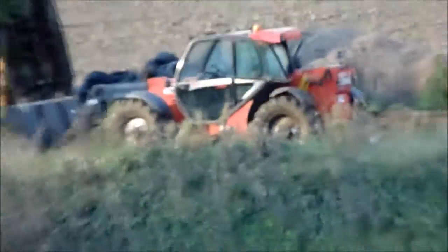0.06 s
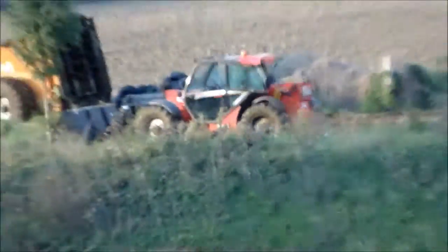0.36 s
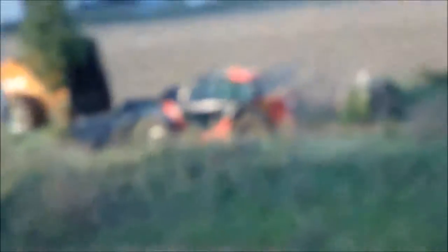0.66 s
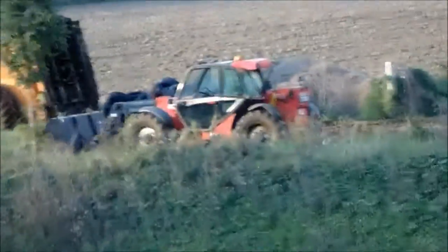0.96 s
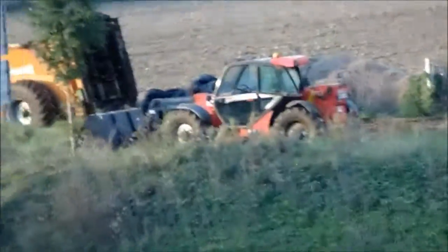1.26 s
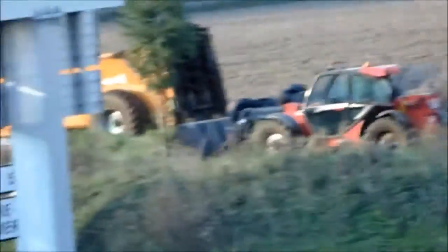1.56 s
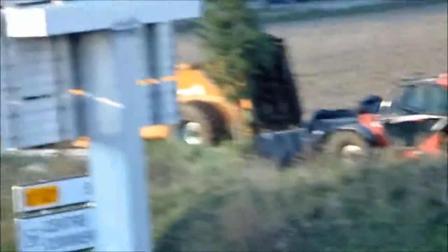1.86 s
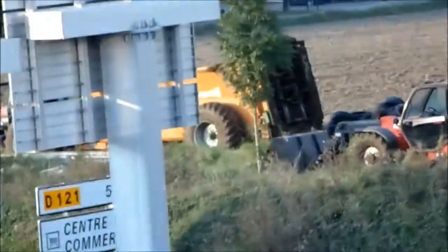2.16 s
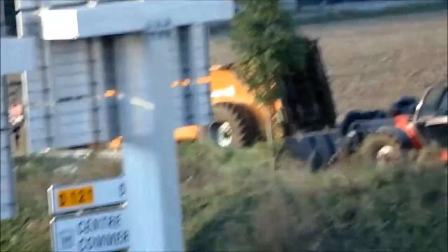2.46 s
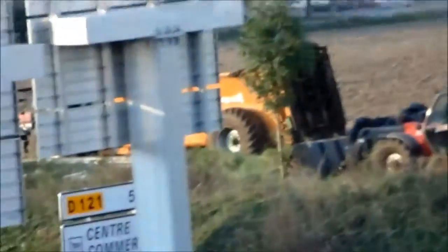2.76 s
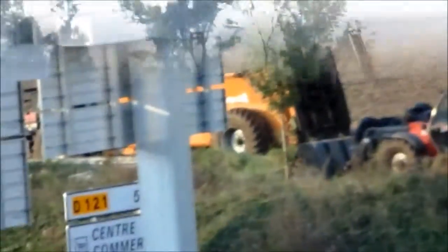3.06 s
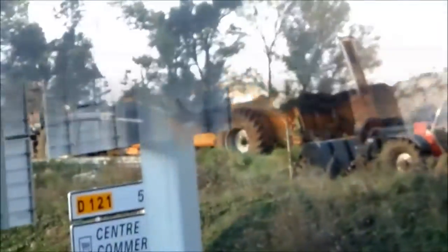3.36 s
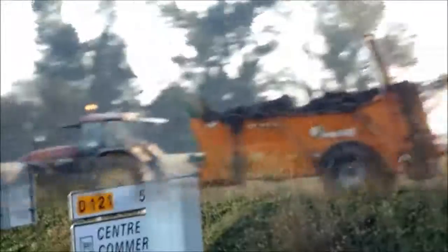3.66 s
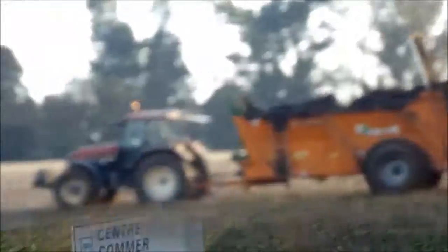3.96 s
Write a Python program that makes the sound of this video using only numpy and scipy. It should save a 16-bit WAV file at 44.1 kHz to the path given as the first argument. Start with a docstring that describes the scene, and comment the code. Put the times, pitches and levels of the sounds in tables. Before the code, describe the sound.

Tyres of passing traffic roar and hiss over a low farm engine. The roar suddenly becomes louder and steady, with a tractor pulling at higher revs. Outdoors, light wind nudges the microphone and the handheld camera clicks.

```python
"""Tyres roar and hiss past farm vehicles working in a field; their ground echo sweeps as the traffic moves,
and the tread hums briefly. Under them a low exhaust note sinks slowly. At 2.8 s the scene cuts to a
louder, steady roar and a tractor pulling at higher revs. Throughout, the camera body clicks in the hand
and wind nudges the microphone."""
import sys
import numpy as np
from scipy import signal
from scipy.io import wavfile
from scipy.ndimage import map_coordinates

SR = 44100
rng = np.random.default_rng(int(sys.argv[2]) if len(sys.argv) > 2 else 0)


def waveform_to_disk(signal):
    """Save audio, clipped to [-1, 1], as 16-bit WAV at the path in sys.argv[1]."""
    frames = np.transpose(np.atleast_2d(signal))
    scaled = np.clip(frames, -1, 1) * 32767
    samples = np.round(scaled).astype(np.int16)
    wavfile.write(sys.argv[1], SR, samples)


N = 176400


def passing_tyres(centre_hz=1128, ground_share=.28):
    """Tread roar of shifting pitch, plus hiss, combed by a ground echo whose lag shrinks."""
    # Each row: time in seconds, roar level in dB, roar pitch in Hz.
    roar_curve = [(0, -31.5, 1100), (.4, -31.5, 1037), (.68, -30, 1005), (1.0, -31, 1050),
                  (1.3, -29.5, 1090), (1.7, -30.5, 1196), (1.92, -31.5, 1170), (2.1, -31.5, 1150),
                  (2.4, -32, 1130), (2.65, -33, 1190), (2.76, -31.5, 1110)]
    # Each row: time in seconds, hiss level in dB.
    hiss_curve = [(0, -48), (.45, -47.5), (.72, -45), (1.05, -45.5), (1.5, -47.5), (1.85, -46.5),
                  (2.0, -51), (2.13, -45), (2.35, -52), (2.6, -51), (2.75, -48)]
    # Each row: time in seconds, echo lag in ms.
    ground_lag = [(0, 1.175), (.2, 1.14), (.4, 1.09), (.6, 1.02), (.9, .9), (1.2, .79), (1.5, .68),
                  (1.75, .59), (2.1, .55), (2.75, .52)]
    # Each row of both spectra: frequency in Hz, relative density in dB.
    roar_spectrum = [(250, -36), (400, -21.5), (600, -12.5), (820, -3), (1100, 0), (1500, -3), (2100, -12),
                     (3000, -16.5), (4500, -28), (7000, -50.5), (14000, -50)]
    hiss_spectrum = [(2500, -4), (5000, 2.5), (6000, -4), (8000, 2.5), (10500, -8.5), (14000, -2.5)]
    roar_db, pitch_hz = in_time(roar_curve)
    hiss_db, = in_time(hiss_curve)
    lag_ms, = in_time(ground_lag)
    roar = banded_noise(roar_spectrum, flicker_db=.75, flicker_hz=18, shift=pitch_hz / centre_hz)
    hiss = banded_noise(hiss_spectrum, flicker_db=2.2, flicker_hz=7.6)
    return with_echoes(from_db(roar_db) * roar + from_db(hiss_db) * hiss, [(lag_ms, ground_share)])


def tread_hum(peak_s=.66, width_s=.13, peak_db=-36.5):
    """A narrow resonance in the tyre noise swells and fades."""
    swell = np.exp(-((np.arange(N) / SR - peak_s) / width_s) ** 2)
    hum = rms_one(ring(rng.standard_normal(N), hz=760, t60_s=.056))
    return from_db(peak_db) * swell * hum


def loud_roar():
    """Steady roar of road and machinery with fixed close reflections."""
    # Each row: time in seconds, level in dB.
    level_curve = [(2.78, -21), (2.9, -22), (3.1, -22.5), (3.7, -23), (4, -22.5)]
    # Each row: frequency in Hz, relative density in dB.
    spectrum = [(250, -17.5), (430, -16), (680, -6.5), (900, 0), (1180, 2.5), (1550, -3), (2050, -9.5),
                (2500, -9.5), (3100, -13), (4300, -19), (6000, -24.5), (9600, -28), (14000, -31.5)]
    # Each row: lag in ms, signed gain.
    reflections = [(1.4, .17), (1.458, -.11), (1.6, .1), (2.005, .08), (2.07, -.08)]
    level_db, = in_time(level_curve)
    roar = banded_noise(spectrum, flicker_db=1.15, flicker_hz=24)
    return from_db(level_db) * with_echoes(roar, reflections)


def low_engine():
    """An exhaust note sinks slowly while the engine's body rumble fades."""
    # Each row: time in seconds, firing rate in Hz, level of the fundamental in dB.
    firing_curve = [(0, 86.3, -37.5), (.3, 84.2, -39.5), (.7, 82.2, -40), (1.3, 80.5, -37.5),
                    (2.0, 79.2, -43), (2.4, 78.5, -41), (2.75, 78, -44.5)]
    # Each row: multiple of the firing rate, relative level in dB.
    orders = [(1, 0), (2, -7.5), (3, -12), (4, -23)]
    # Each row: time in seconds, rumble level in dB.
    rumble_curve = [(0, -43), (.5, -47), (1.1, -51), (1.7, -55), (2.75, -61)]
    # Each row: frequency in Hz, relative density in dB.
    rumble_spectrum = [(150, 7.5), (250, 4.5), (330, -5.5), (480, 0), (700, -4)]
    firing_hz, note_db = in_time(firing_curve)
    rumble_db, = in_time(rumble_curve)
    note = exhaust(firing_hz, orders, wobble=.0014, rough=.08)
    rumble = banded_noise(rumble_spectrum, flicker_db=2.5, flicker_hz=11)
    return from_db(note_db) * note + from_db(rumble_db) * rumble


def tractor(crank_hz=31.18, note_db=-40, rumble_db=-36):
    """A diesel under load: crank partials in a bed of rumble."""
    # Each row: multiple of the crank rate, relative level in dB.
    orders = [(3, -7), (5, 0), (5.5, -5), (6, 0), (9, -11)]
    # Each row: frequency in Hz, relative density in dB.
    rumble_spectrum = [(40, -20), (90, 0), (165, -3), (230, -7.5), (330, -11.5), (600, -18.5)]
    note = exhaust(crank_hz, orders, wobble=.0018, rough=.098)
    rumble = banded_noise(rumble_spectrum, flicker_db=.5, flicker_hz=10)
    return from_db(note_db) * note + from_db(rumble_db) * rumble


def exhaust(hz, orders, wobble, rough):
    """Partials of an engine whose speed wavers and whose strokes vary in strength."""
    phase = 2 * np.pi * np.cumsum(hz * (1 + wobble * drift(7.8))) / SR
    out = 0
    for order, db in orders:
        strength = from_db(db) * (1 + rough * drift(6.4))
        out += strength * np.sin(order * phase + rng.uniform(0, 2 * np.pi))
    return np.sqrt(2) * out


def camera_clicks(grit=.19, contact_s=.0004):
    """Short gritty contacts ring the camera's plastic body."""
    # Each row: start in seconds, then drive in dB of hollow knock, shell, middle ring, bright tick.
    clicks = [(0.3146, -50, -28, -39, -20), (1.085, -55, -48, -53, -32), (1.122, -50, -50, -46, -32),
              (2.379, -48, -40, -38, -34), (2.4544, -20.5, -9.5, -24.5, -19), (2.4571, -21, -16, -36, -28),
              (2.5609, -26, -21, -20, -42), (2.7144, -31, -13.5, -38, -32), (2.717, -34, -16, -40, -29),
              (2.7192, -30, -18, -42, -32), (2.726, -32, -23, -36, -29), (3.172, -35, -18, -34, -26),
              (3.7208, -28, -17, -28, -36), (3.753, -12.5, -8, -17, -34), (3.9646, -16, -15, -16, -24)]
    # One group per part, in that order. Each row: mode in Hz, gain in dB, T60 in seconds.
    body_modes = [
        [(900, -6.5, 0.016), (1690, -2, 0.021)],
        [(2340, -8, 0.01), (2867, -7.5, 0.016), (3460, -11.5, 0.019), (3730, -13.5, 0.011)],
        [(4540, -1, 0.0092), (5150, -6, 0.008), (8000, -10, 0.0041)],
        [(9870, -5, 0.0021), (11150, 0, 0.0048), (12160, 10, 0.001), (14000, -9.5, 0.0058)],
    ]
    out, age_s = np.zeros(N), np.arange(SR // 100) / SR
    for part, modes in enumerate(body_modes):
        for k, (hz, mode_db, t60_s) in enumerate(modes):
            force = np.zeros(N + SR)
            for start_s, *drive_db in clicks:
                scrape = grit * rng.standard_normal(len(age_s)) * np.exp(-age_s / contact_s)
                contact = (age_s == 0) + scrape
                start = int(start_s * SR)
                force[start:start + len(age_s)] += from_db(drive_db[part] + mode_db) * contact
            out += (-1) ** k * ring(force[:N], hz, t60_s)
    return out


def wind(puff_width_cycles=.34):
    """Lumpy rumble on the microphone; each puff is one quickly damped swing of pressure."""
    # Each row: time in seconds, rumble level in dB.
    level_curve = [(0, -35), (.25, -42), (.75, -35), (1.2, -37), (1.85, -35.5), (2.15, -37), (2.5, -43),
                   (2.8, -35), (3.25, -38), (3.55, -35.5), (4, -37.5)]
    # Each row: frequency in Hz, relative density in dB.
    spectrum = [(15, 2), (30, -4), (50, 2.5), (80, -2), (125, -3.5), (200, -9), (270, -15), (350, -39),
                (700, -30)]
    # Each row: start in seconds, envelope peak in dB, frequency in Hz.
    puffs = [(.755, -17, 75), (1.005, -24, 49.5), (1.505, -23, 50.4), (1.853, -21.5, 54), (2.191, -22, 55),
             (2.271, -24, 61), (3.186, -25, 45.6), (3.236, -23, 55.3), (3.86, -18, 65),
             (3.973, -15.5, 61.5)]
    level_db, = in_time(level_curve)
    out = from_db(level_db) * banded_noise(spectrum, flicker_db=2.5, flicker_hz=6.7)
    for start_s, peak_db, hz in puffs:
        cycles = np.maximum(np.arange(N) / SR - start_s, 0) * hz
        envelope = from_db(peak_db) * np.exp(-((cycles - .5) / puff_width_cycles) ** 2)
        out += envelope * np.sin(2 * np.pi * cycles)
    return out


def banded_noise(spectrum, flicker_db, flicker_hz, shift=1):
    """Unit-rms noise in separately flickering third octaves; shift scales the spectrum's frequencies."""
    hz, db = np.transpose(spectrum)
    log_hz = np.log([hz[0] / 2, *hz, hz[-1] * 2])
    edges_hz = 15.6 * 2 ** (np.arange(31) / 3)
    white = rng.standard_normal((2, N + SR // 2))
    out, floor_db = 0, -70
    for k, (low, high) in enumerate(zip(edges_hz, edges_hz[1:])):
        level_db = np.interp(np.log(np.sqrt(low * high) / shift), log_hz, [floor_db, *db, floor_db])
        if np.max(level_db) > floor_db:
            bandpass = signal.butter(2, [low, high], "band", fs=SR, output="sos")
            band = signal.sosfilt(bandpass, white[k % 2])[-N:]
            out += band * from_db(level_db + flicker_db * drift(flicker_hz))
    return rms_one(out)


def with_echoes(x, echoes):
    """Direct sound plus reflections (lag in ms, gain), at about the same power."""
    late = sum(gain * map_coordinates(x, [np.arange(N) - ms * SR / 1000], order=3) for ms, gain in echoes)
    return (x + late) / np.sqrt(1 + sum(gain ** 2 for _, gain in echoes))


def ring(force, hz, t60_s):
    """One damped mode; a unit impulse starts a sine of height 1."""
    r, w = np.exp(-np.log(1000) / (t60_s * SR)), 2 * np.pi * hz / SR
    return signal.lfilter([0, np.sin(w)], [1, -2 * r * np.cos(w), r * r], force + 1e-18)


def drift(corner_hz):
    """Slow random wander, rms 1."""
    hop, settle = 40, 2000
    r = np.exp(-2 * np.pi * corner_hz * hop / SR)
    white = rng.standard_normal(N // hop + settle + 2)
    slow = signal.lfilter([1], [1, -2 * r, r * r], white)[settle:]
    return np.interp(np.arange(N) / hop, np.arange(len(slow)), rms_one(slow))


def in_time(rows):
    """Each value column of a curve at every sample."""
    times_s, *columns = np.transpose(rows)
    return [np.interp(np.arange(N) / SR, times_s, column) for column in columns]


def from_db(db):
    """Decibels to gain."""
    return 10 ** (np.asarray(db) / 20)


def rms_one(x):
    """Scale to unit power."""
    return x / np.sqrt(np.mean(x ** 2) + 1e-20)


def scene(cut_s=2.779, fade_s=.0036):
    """Two roadside scenes joined by a cut, with wind and handling throughout."""
    first = low_engine() + passing_tyres() + tread_hum()
    second = tractor() + loud_roar()
    blend = np.clip((np.arange(N) / SR - cut_s) / fade_s + .5, 0, 1)
    return ((1 - blend) * first + blend * second + wind() + camera_clicks())[None]


def record(dry):
    """Steep low-pass on the top treble."""
    cutoff_hz = 14250
    return signal.sosfilt(signal.ellip(12, .1, 80, cutoff_hz, fs=SR, output="sos"), dry)


dry = scene()
out = record(dry)
waveform_to_disk(out)
```